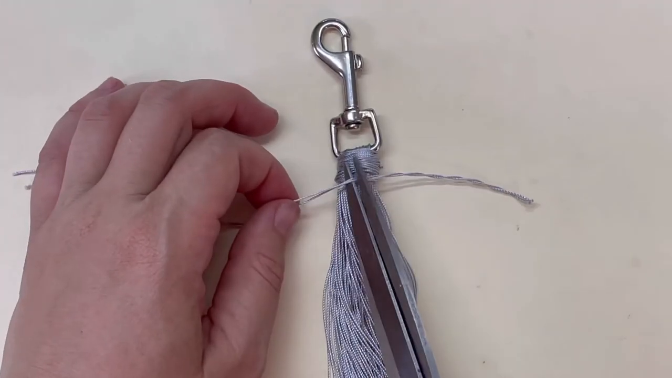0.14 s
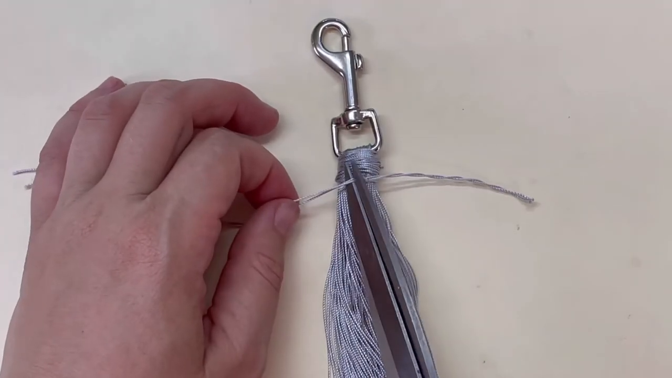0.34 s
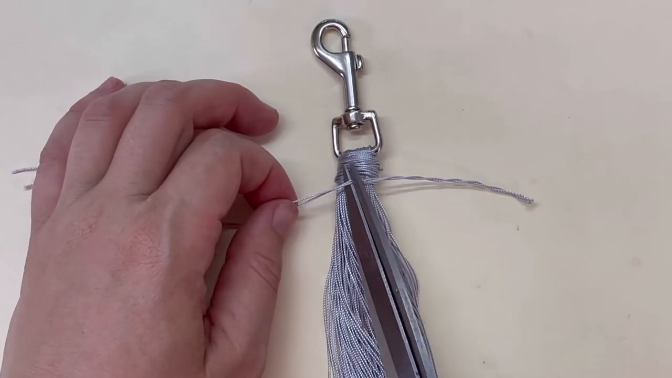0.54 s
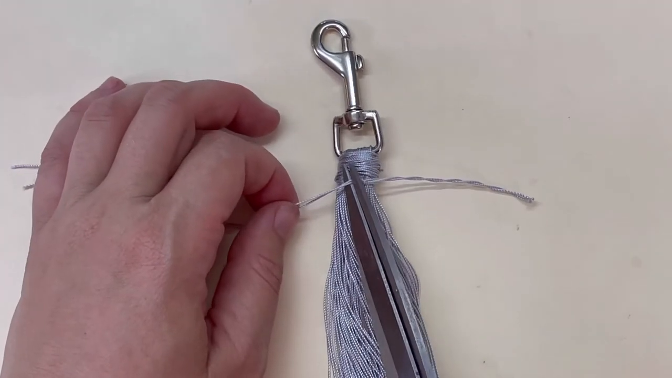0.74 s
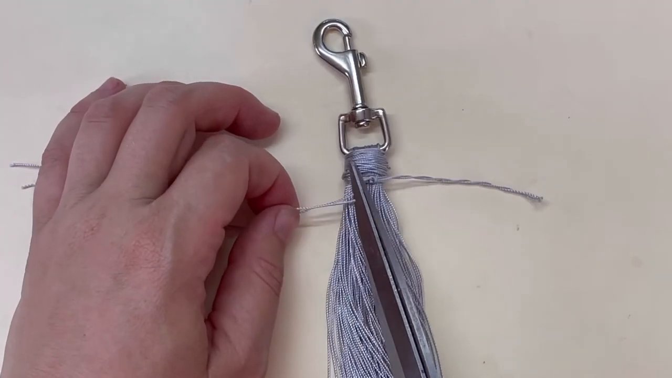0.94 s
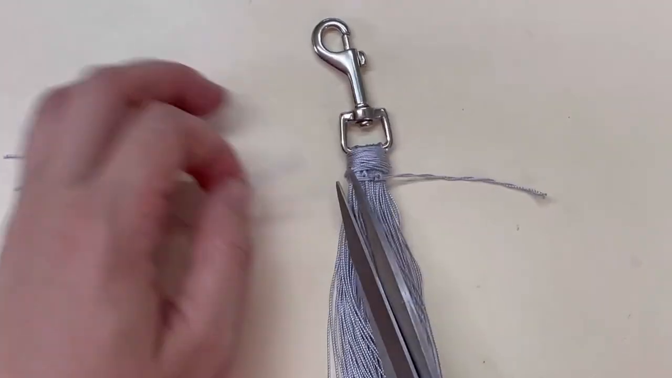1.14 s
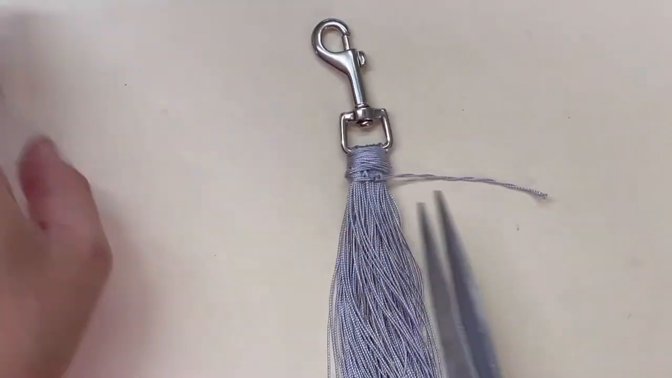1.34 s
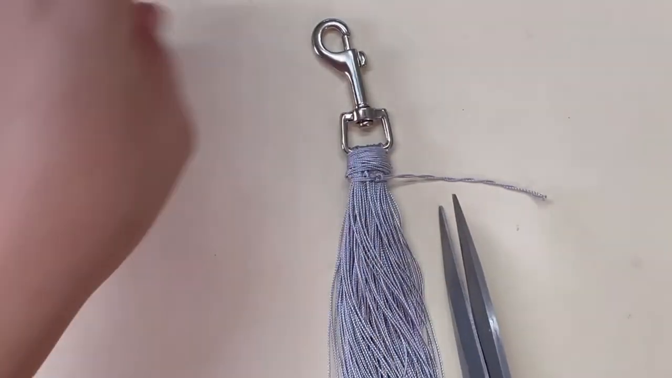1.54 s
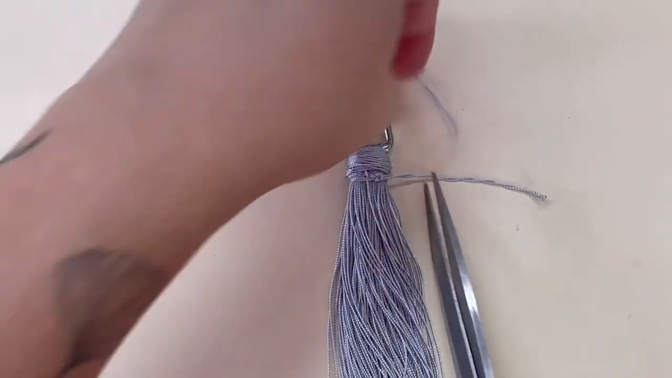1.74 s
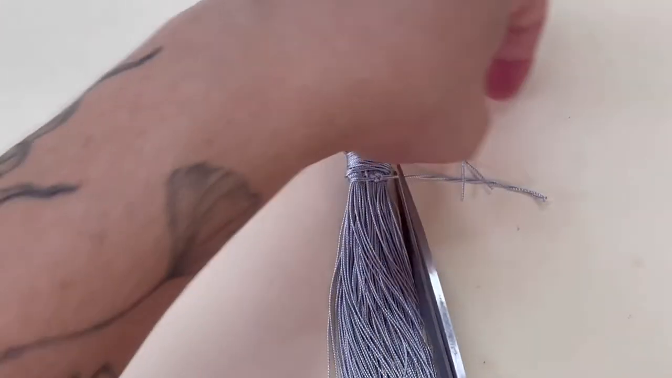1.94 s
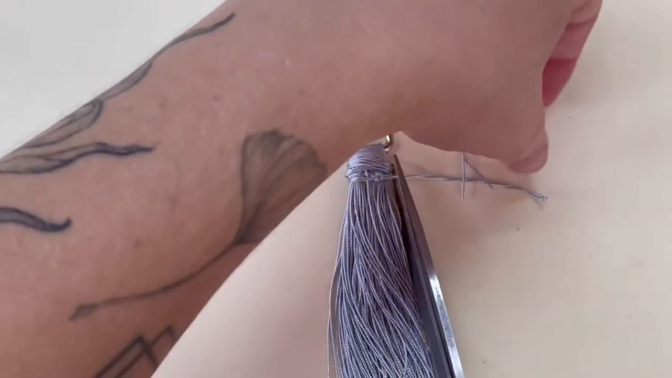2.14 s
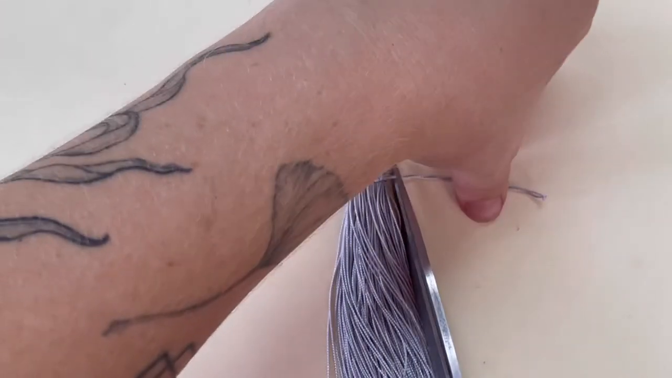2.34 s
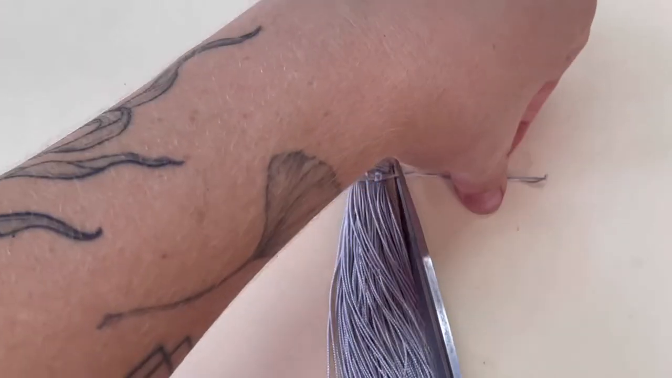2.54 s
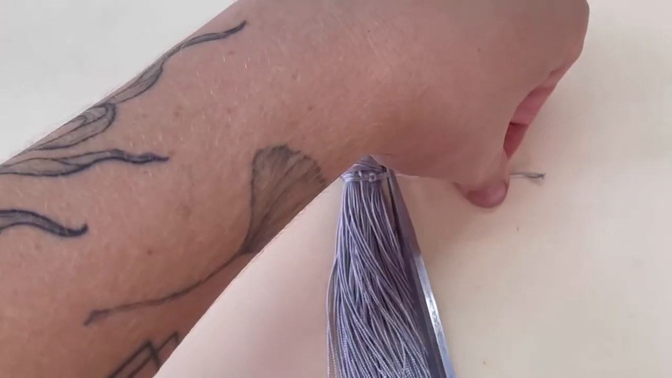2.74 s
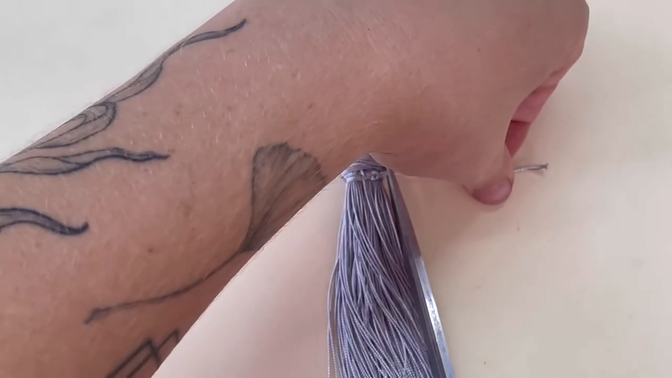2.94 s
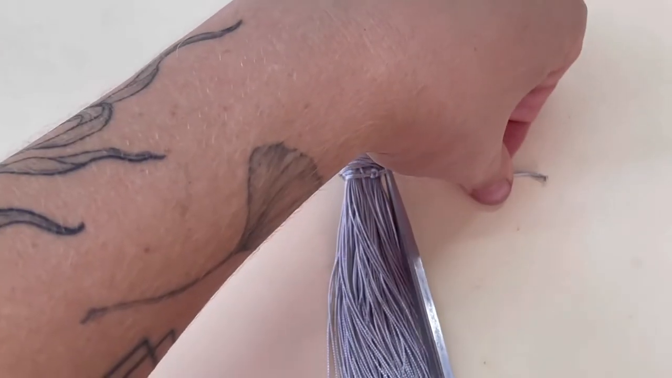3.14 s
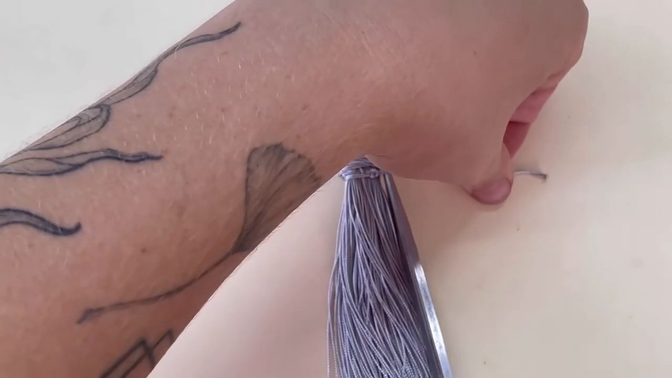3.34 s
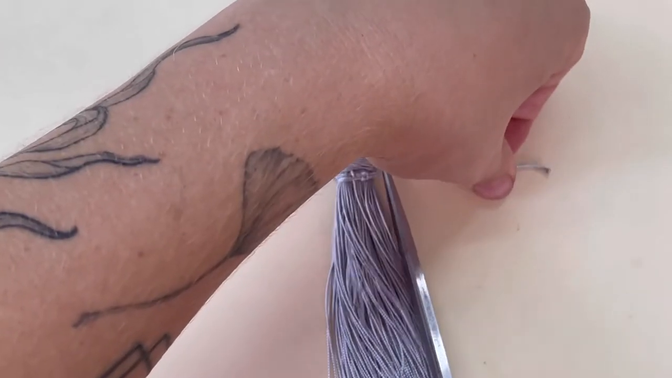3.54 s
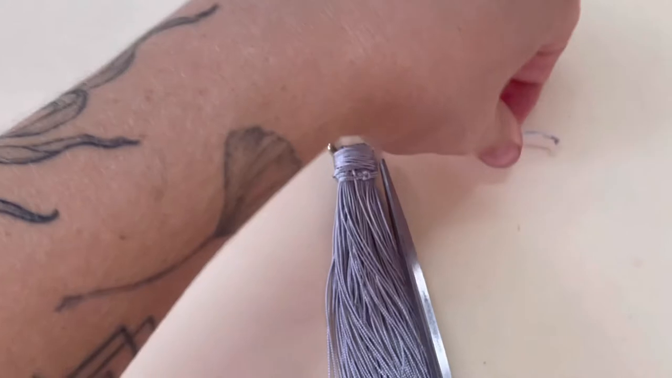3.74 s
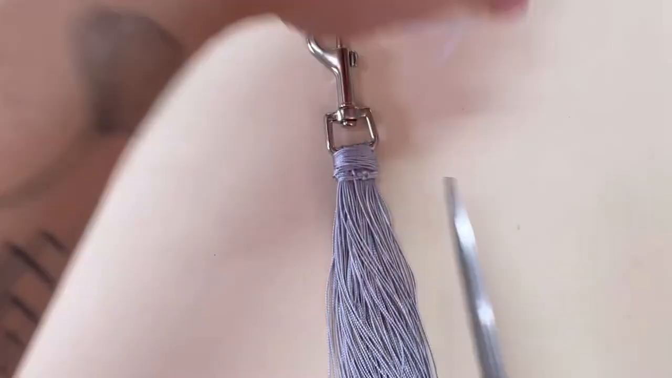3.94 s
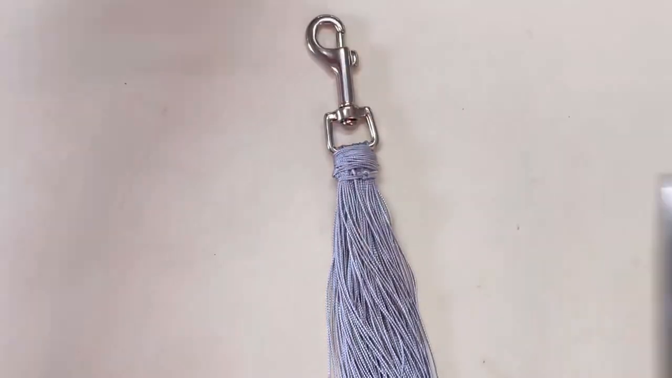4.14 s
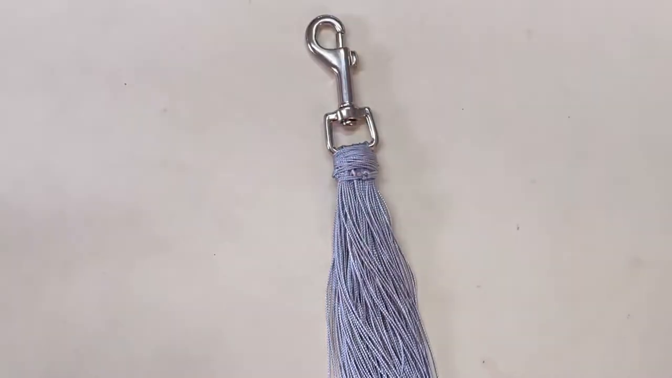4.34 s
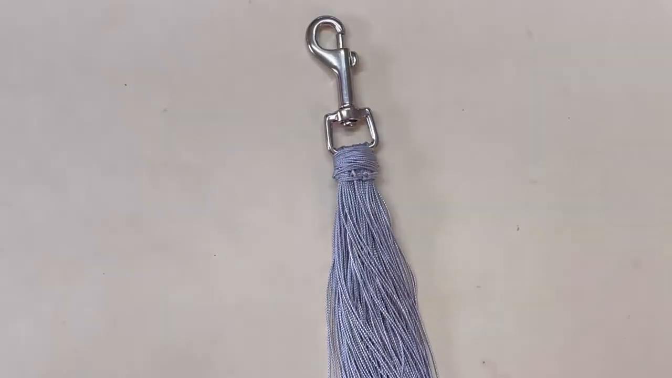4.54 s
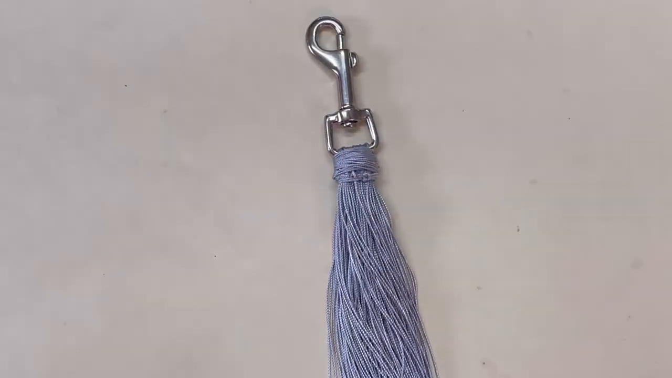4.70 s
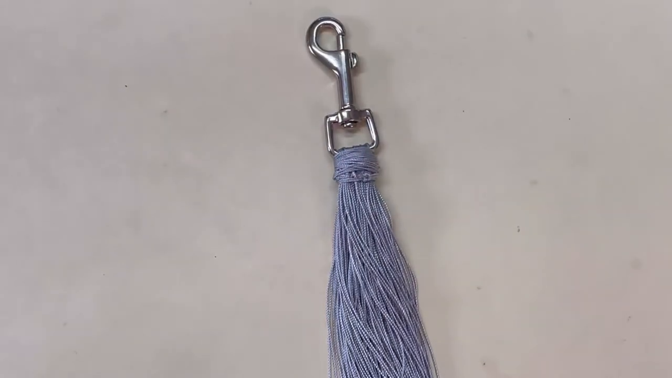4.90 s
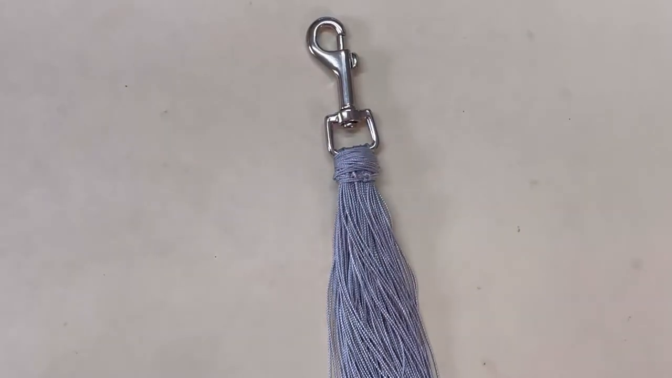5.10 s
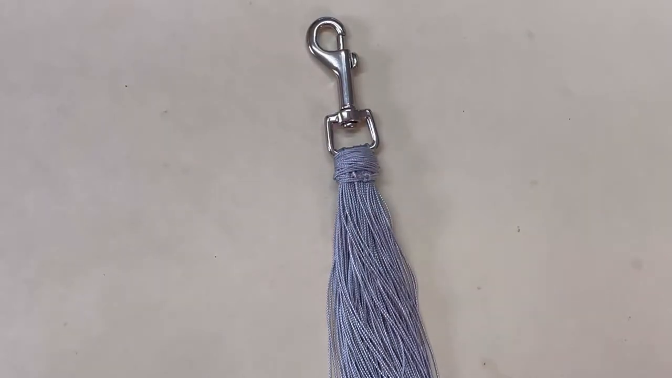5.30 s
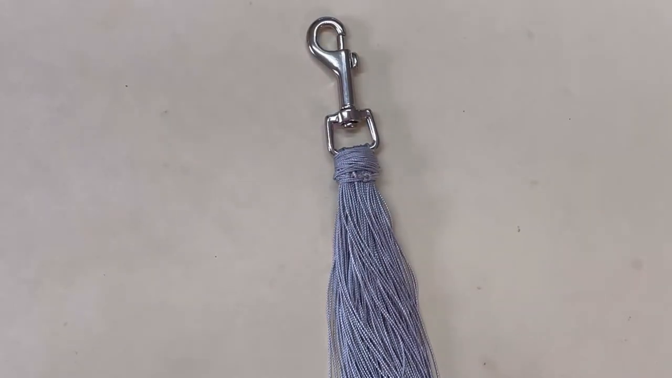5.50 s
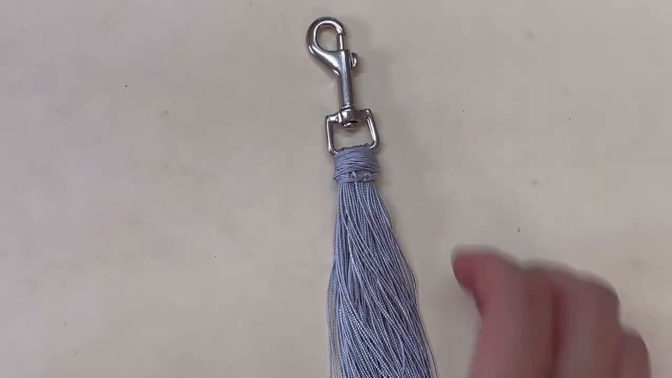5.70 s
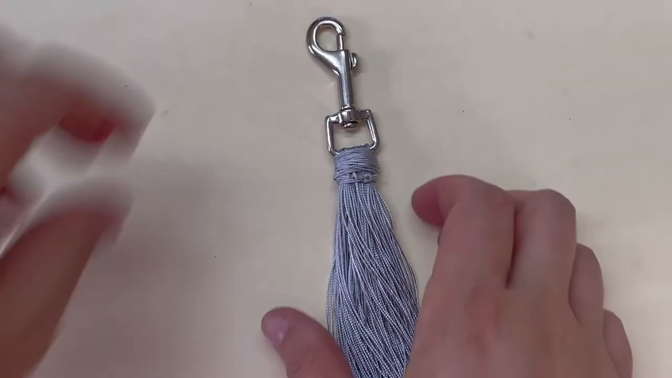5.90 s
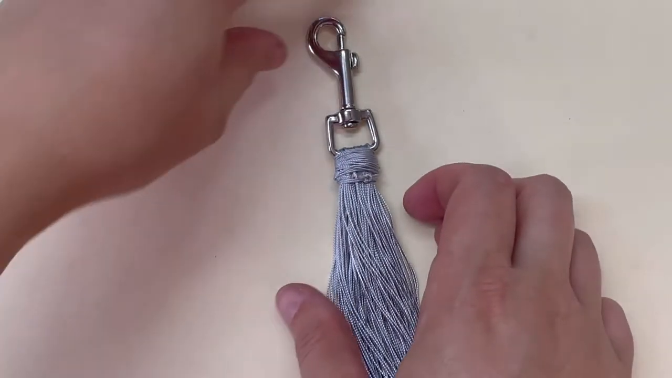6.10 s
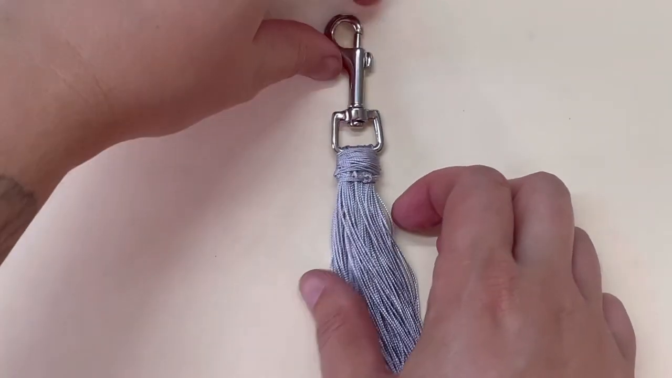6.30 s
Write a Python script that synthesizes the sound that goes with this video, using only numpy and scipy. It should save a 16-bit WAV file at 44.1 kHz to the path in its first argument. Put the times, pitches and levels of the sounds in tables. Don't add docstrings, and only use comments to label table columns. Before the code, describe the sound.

Close-up in a quiet small room: a sharp bright snip, soft rustling, a gentler snip, then scissors set down with a rattling woody knock.

```python
import sys
import numpy as np
from scipy import signal
from scipy.fft import rfft, irfft, next_fast_len
from scipy.io import wavfile

SR = 44100
rng = np.random.default_rng(int(sys.argv[2]) if len(sys.argv) > 2 else 0)


def gain_from_db(level_db):
    decades = np.asarray(level_db, float) / 20
    return 10 ** decades


def store_pcm(level_fs):
    pcm = np.round(np.clip(level_fs, -1, 1) * 32767).astype(np.int16)
    wavfile.write(sys.argv[1], SR, np.atleast_2d(pcm).T)


N = 284886
T = np.arange(N) / SR
SPAN = 16384
WIDE = next_fast_len(N)


def band(x, lo_hz, hi_hz):
    sos = signal.butter(2, [lo_hz, min(hi_hz, .45 * SR)], "band", fs=SR, output="sos")
    return signal.sosfilt(sos, x)


def unit(x):
    return x / np.sqrt(np.mean(x ** 2))


def walk(rate_hz):
    return 0.8 * np.interp(T * rate_hz, np.arange(N // 400), rng.standard_normal(N // 400))


def add(out, s, x, db):
    i = int(s * SR)
    out[i:i + len(x)] += (x * gain_from_db(db) / np.abs(x).max())[:N - i]


# (frequency [Hz], density [dB per Hz])
RUMBLE_SPECTRUM = [(12, -41), (24, -18), (45, -10), (62, 3), (93, 1), (150, -13), (310, -26), (780, -40.5),
                   (1600, -45), (2800, -47.5), (5000, -51), (8000, -51.5), (11000, -48), (13000, -53)]
# (time [s], level [dB])
RUMBLE_SWELL = [(0.0, -61.5), (1.35, -59), (2.09, -58), (2.19, -52.5), (2.47, -60), (4.05, -63),
                (4.23, -57.5), (4.77, -59.5), (5.02, -50), (5.4, -60), (6.21, -60.5), (6.46, -58.5)]


def rumble():
    hz = np.fft.rfftfreq(WIDE, 1 / SR) + 1
    corner_hz, density_db = np.transpose(RUMBLE_SPECTRUM)
    shape = gain_from_db(np.interp(np.log(hz), np.log(corner_hz), density_db))
    mid, side = rfft(rng.standard_normal((2, WIDE))) * shape * np.clip((14000 - hz) / 1200, 0, 1)
    apart = np.clip((hz - 150) / 350, 0, 1) * np.clip((2200 - hz) / 900, 0, 1)
    pair = mid + apart * side * np.array([[1], [-1]])
    low = 1 / (1 + (hz / 150) ** 4)
    bass = irfft(pair * low, WIDE)[:, :N]
    hiss = irfft(pair * (1 - low), WIDE)[:, :N]
    swell = gain_from_db(np.interp(T, *np.transpose(RUMBLE_SWELL)) + 2)
    return unit(bass) * swell + unit(hiss) * gain_from_db(-72.0)


# (centre frequency [Hz], level [dB])
ROOM_BANDS = [(500, -7), (1000, -6), (2000, -7), (3500, -3.5), (6500, 4.5), (10500, 3.5)]
ROOM_DECAY = [.3, .36, .38, .36, .33, .29]


def room(x, wet_db=-18, bite_db=6):
    t, send, tail = T[:SPAN], x.copy(), 0
    for s, db, *_ in SNIPS:
        add(send, s, np.ones(1), db + bite_db)
    for (hz, db), t60 in zip(ROOM_BANDS, ROOM_DECAY):
        wash = band(rng.standard_normal(SPAN), hz / 1.5, hz * 1.36)
        tail = tail + wash * gain_from_db(db - 60 * t / t60)
    tail *= np.clip((t - .003) / .022, 0, 1)
    tail *= gain_from_db(-190 * t ** 2)
    return gain_from_db(wet_db) * signal.fftconvolve(send, tail / np.linalg.norm(tail))[:N]


def strokes(start, hold, db, rise, fall):
    t = T[::64, None]
    before, after = np.maximum(start - t, 0), np.maximum(t - start - hold, 0)
    shape_db = db - rise * before - fall * after
    return 10 * np.log10((gain_from_db(shape_db) ** 2).sum(axis=1) + 1e-13)


def cloth_powers(table, rise, fall, sheen_db, share):
    start, hold, weave_db, over = np.transpose(table)
    parts_db = (weave_db, weave_db + over, weave_db + sheen_db + share * over)
    return gain_from_db(np.array([strokes(start, hold, db, rise, fall) for db in parts_db])) ** 2


# (start [s], hold [s], level [dB])
SKIN_RUBS = [(1.054, 0.031, -66.5), (1.136, 0.024, -70), (1.425, 0.018, -61.5), (1.483, 0.59, -74.5),
             (2.056, 0.014, -67), (2.1, 0.26, -76.5), (2.235, 0.012, -70), (2.402, .1, -80.5),
             (2.652, 0.043, -72), (2.714, 0.085, -73.5), (3.787, .25, -88), (4.081, 0.018, -64),
             (4.095, 0.56, -69.5), (4.268, 0.064, -73), (4.626, 0.11, -81.5), (4.775, 0.35, -59.5),
             (5.096, .17, -65.5), (5.297, 0.47, -72), (5.441, 0.036, -72.5), (5.871, 0.067, -64.5),
             (5.781, 0.266, -67), (6.0, 0.5, -71), (6.184, 0.011, -69)]


def skin_rubs():
    return strokes(*np.transpose(SKIN_RUBS), rise=960, fall=480)


# (start [s], hold [s], weave level [dB], fibres over weave [dB])
SLEEVE_SWEEPS = [(1.54, 0.46, -74.5, -0.5), (1.76, 0.068, -77.5, 3), (1.89, 0.038, -70, -0.5),
                 (1.985, 0.0047, -69.5, 1.5), (4.21, 0.074, -73, -2), (4.41, 0.11, -67.5, -6.5),
                 (5.31, .2, -77.5, -8.5), (4.62, 0.077, -78.5, -8), (1.46, 0.058, -84, -11),
                 (5.55, .25, -78, -3), (5.86, 0.073, -66.5, -3), (5.95, 0.18, -73.5, -2),
                 (6.2, 0.12, -79, 0), (6.3, 0.12, -76, 4)]


def sleeve_sweeps():
    return cloth_powers(SLEEVE_SWEEPS, rise=127, fall=245, sheen_db=0, share=0.13)


# (start [s], hold [s], weave level [dB], fibres over weave [dB])
BLADE_DRAGS = [(1.035, .015, -73, 4), (1.048, 0.025, -62.5, 0.5), (1.09, 0.051, -74.5, -2),
               (1.142, 0.013, -73.5, 2.5), (1.425, 0.047, -74.5, -13), (2.065, 0.021, -71.5, -0.5),
               (2.242, 0.017, -74, -3), (2.26, 0.075, -81, 2.5), (2.381, 0.0046, -85, 9),
               (2.39, 0.099, -85, 2), (2.652, 0.023, -79.5, -16), (3.79, 0.014, -79.5, -10),
               (4.02, .05, -97.5, -12), (4.073, .52, -70.5, -5.5), (4.77, 0.02, -59.5, -6.5),
               (4.81, .15, -67.5, 2.5), (4.96, .12, -68, 0.5), (5.09, 0.033, -72.5, -9),
               (5.293, .012, -71, -6), (6.187, 0.0072, -67.5, -5.5)]


def blade_drags():
    return cloth_powers(BLADE_DRAGS, rise=3600, fall=540, sheen_db=-10, share=0.62)


# (centre frequency [Hz], gain [dB])
RUSTLE_BANDS = [(244, -5), (476, -6), (780, -9.5), (1050, -4), (1460, -6.5), (2100, -4.5), (2800, -5.5),
                (4120, -6), (5660, -6), (7900, -3.5), (10000, -7), (12000, -2), (13700, -13)]
RUSTLE_LAYERS = [0, 0, 0, 1, 1, 1, 1, 2, 2, 2, 3, 3, 3]


def rustle():
    curves = [skin_rubs(), *(10 * np.log10(sleeve_sweeps() + blade_drags()))]
    grit = gain_from_db(2.0 * rng.exponential(size=N)) * rng.standard_normal((2, N))
    mid, side, catch_db = 0, 0, 2.2 * walk(45)
    for k, ((hz, gain_db), layer) in enumerate(zip(RUSTLE_BANDS, RUSTLE_LAYERS)):
        spread = min(1.38, 1.11 + 250 / hz)
        level_db = np.interp(T, T[::64], curves[layer]) + gain_db + catch_db + 3.5 * walk(12)
        gain = (-1) ** k * gain_from_db(level_db)
        mid = mid + gain * unit(band(grit[0], hz / spread, hz * spread))
        if hz < 2000:
            apart = min((2000 - hz) / 900, 1)
            side = side + gain * apart * unit(band(grit[1], hz / spread, hz * spread))
    return np.array([mid + side, mid - side])


# (time [s], peak [dB], centre frequency [Hz], bending delay at 1 Hz [s])
BOARD_BLOWS = [(0.837, -33.5, 517, .09), (0.848, -41.5, 106, .2), (1.048, -57, 401, .09),
               (1.429, -29.5, 195, 0.13), (2.064, -48.5, 436, .09), (2.296, -54, 350, .09),
               (2.381, -62, 454, 0.11), (3.496, -40.5, 131, 0.14), (1.059, -48.5, 98.6, .2),
               (1.45, -33, 106, 0.19), (2.081, -46.5, 135.7, .15), (2.30, -45.5, 113, .15),
               (4.766, -16, 545, .125), (4.77, -20.5, 194, .11), (4.799, -23.5, 530, .12),
               (4.819, -40.5, 300, 0.098), (5.012, -26.5, 75, 0.143), (5.08, -29, 70.4, 0.12),
               (4.78, -27.5, 110, 0.152), (5.0045, -9.5, 410, .125), (5.0272, -18, 400, .125),
               (5.0401, -12.5, 410, .125), (5.0774, -12, 397, .125), (5.102, -29.5, 380, .11),
               (6.187, -52, 450, .09)]


def knocks(count=40):
    out, hz = np.zeros(N), np.fft.rfftfreq(SPAN, 1 / SR)[:SPAN // 8] + 1e-9
    chance = rng.random((len(BOARD_BLOWS), 2, count))
    for (s, db, centre_hz, near), (place, sign) in zip(BOARD_BLOWS, chance):
        path = np.append(near, near + .13 + 2.0 * place)[:, None]
        gain = np.append(1, 0.33 * (2 * sign - 1))[:, None] * np.sqrt(near / path)
        loss = gain_from_db(-.12 * (path - near) * hz ** 0.64)
        waves = gain * loss * np.exp(-4j * np.pi * path * np.sqrt(hz))
        blow = (hz / centre_hz) ** 1.4 / (1 + (hz / centre_hz / 1.116) ** 6.5)
        add(out, s, irfft(blow * waves.sum(axis=0), SPAN)[:SPAN * 3 // 4], db)
    return out


# (time [s], peak [dB], centre frequency [Hz], sharp edge [dB])
CONTACT_TICKS = [(0.0758, -53, 4470, -7), (0.2238, -58.5, 2300, 17), (0.5693, -64, 2630, 0),
                 (1.241, -60, 8800, -4), (1.7588, -47, 1990, -8), (1.8855, -45.5, 3000, -10),
                 (1.9239, -42.5, 1970, -15), (2.064, -52, 1780, -8), (2.2415, -43.5, 1930, -21),
                 (2.2952, -49.5, 2840, -4), (2.3805, -37.5, 3240, 9.5), (2.5695, -59, 2720, -8.5),
                 (2.6513, -55.5, 1500, -11), (2.6625, -64, 1823, -8), (2.676, -66, 2560, -10),
                 (2.859, -66.5, 1916, -7.5), (3.1385, -58.5, 5850, -2), (3.3583, -59, 3186, -6),
                 (4.078, -66, 2000, 0), (5.2922, -53, 1910, -9), (5.8054, -55.5, 2570, -18.5),
                 (6.1848, -48.5, 1930, -16), (6.2472, -50.5, 6480, -5.5), (6.2876, -46, 3380, -2),
                 (0.8197, -51.5, 3000, -3), (0.828, -41.5, 3500, -12.5), (1.0485, -38.5, 2790, -2),
                 (1.065, -40.5, 2790, -6.5), (1.0701, -38.5, 2330, -11), (1.078, -40.5, 2660, 2),
                 (1.143, -45, 1840, -7.5), (1.4191, -37, 2400, -18), (1.429, -46, 3020, -22),
                 (1.4504, -52, 2670, -12), (3.484, -48.5, 2500, -13), (3.759, -53, 3200, -10),
                 (3.7742, -41, 3790, -10), (4.758, -70.5, 2460, -19), (4.7658, -22, 2720, -6.5),
                 (4.7733, -26.5, 3720, 2), (4.798, -27, 2340, -14), (4.8209, -40, 2510, -30),
                 (4.941, -53, 3190, -5.5), (5.005, -28.5, 2300, -8.5), (5.027, -31.5, 2780, -6.5),
                 (5.041, -30, 2580, -9.5), (5.0778, -34, 2170, -17), (5.103, -47.5, 1820, -10)]


def ticks():
    out, t = np.zeros(N), T[:1024]
    contacts = CONTACT_TICKS
    grit = rng.standard_normal((len(contacts), 1024))
    for (s, db, hz, edge_db), g in zip(contacts, grit):
        burst = g * np.exp(-t / 0.001)
        add(burst, 0, np.ones(1), 10)
        body, edge = band(burst, hz / 2.0, hz * 2.2), band(burst, 4500, 13500)
        add(out, s + 0.0012, body + gain_from_db(edge_db) * edge, db)
    return out


# (time [s], peak [dB], scrape before the bite [dB], scrape length [s],
# rebound [dB], rebound delay [s])
SNIPS = [
    (0.8370, -1.3, -31, 0.0079, -15, .003),
    (3.4977, -7, -24, 0.010, -11, .0038),
]
# (frequency [Hz], width [Hz], level [dB])
BLADE_MODES = [
    [(2000, 820, -14.5), (2993, 520, -6), (4420, 870, -3.5), (6560, 1100, 2.5), (8520, 820, -1.5),
     (9420, 900, 1.5), (11220, 650, -3), (11600, 600, -4), (13200, 700, 1), (15150, 1400, -6)],
    [(900, 470, -18), (2000, 640, -13.5), (2795, 370, -5.5), (3580, 400, -8), (4300, 590, -2),
     (6140, 1200, -1.5), (7400, 330, 3.5), (8867, 1000, -4.5), (11400, 1400, 3.5), (12500, 700, -6),
     (13400, 900, 3)],
]
# (frequency [Hz], level [dB], decay by 60 dB [s])
BLADE_RING = [(2980, -3, 0.099), (4200, -3.5, .24), (5970, -0.5, 0.26), (7450, -1, 0.25),
              (10835, 1.5, 0.57), (13330, 4, .15)]


def snips():
    out, t, bite = np.zeros(N), T[:SPAN], .02
    for (s, db, scrape_db, length, back_db, back), modes in zip(SNIPS, BLADE_MODES):
        crush = gain_from_db(-16.5) * np.exp(-np.abs(t - bite) / 0.001) * (t > bite)
        rebound = gain_from_db(back_db - 15.5) * np.exp(-np.abs(t - bite - back) / .0015) * (t > bite + back)
        scrape = gain_from_db(scrape_db - 13.0) * np.clip(1.6 - (bite - t) / length, 0, 1) ** 3 * (t < .022)
        force = rng.standard_normal(SPAN) * (crush + rebound + scrape)
        add(force, bite, np.ones(1), 0)
        steel = gain_from_db(-15.5) * band(force, 420, 16000)
        for k, (hz, width, g) in enumerate(modes):
            mode = band(force, hz - width / 2, hz + width / 2) * np.sqrt(900 / width)
            steel = steel + (-1) ** k * gain_from_db(g) * mode
        add(out, s - bite, steel, db)
        ring = 0
        for hz, g, t60 in BLADE_RING:
            ring = ring + gain_from_db(g - 60 * t / t60) * unit(band(rng.standard_normal(SPAN), hz - 60, hz + 60))
        add(out, s, ring, db - 38)
    return out


def scene():
    board, small = knocks(), ticks()
    lean = .17 * band(board, 330, 900) * np.array([[1], [-1]])
    return snips() + small + room(small) + board + lean + rustle() + rumble()


# (frequency [Hz], phase [rad])
PORT_LAG = [(0, 0), (4000, .65), (4500, 1.0), (4915, 2.2), (5035, -1.1), (5300, -.1), (6400, .95),
            (10000, 3.12), (12600, 4.5), (14100, 6.1), (22050, 6.3)]


def two_ports(dry):
    hz, top_hz = np.fft.rfftfreq(WIDE, 1 / SR), 16300
    lag = np.exp(-1j * np.array([0 * hz, np.interp(hz, *np.transpose(PORT_LAG))]))
    edge_hz = [top_hz - 900, top_hz - 500, top_hz, top_hz + 200]
    top_cut = np.interp(hz, edge_hz, [1, .25, 0.046, 0.034])
    return irfft(rfft(dry, WIDE) * lag * top_cut, WIDE)[:, :N]


def roll_off(x):
    return signal.sosfilt(signal.butter(12, 16640, fs=SR, output="sos"), x)


def record(dry):
    mix = two_ports(dry)
    return roll_off(mix)


dry = scene()
out = record(dry)
store_pcm(out)
```